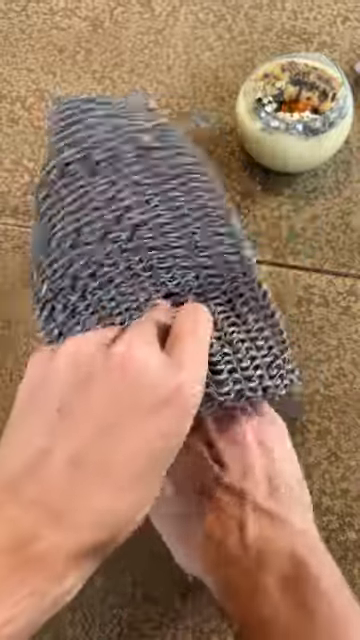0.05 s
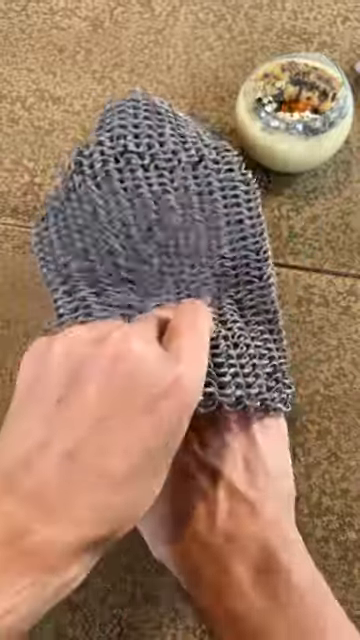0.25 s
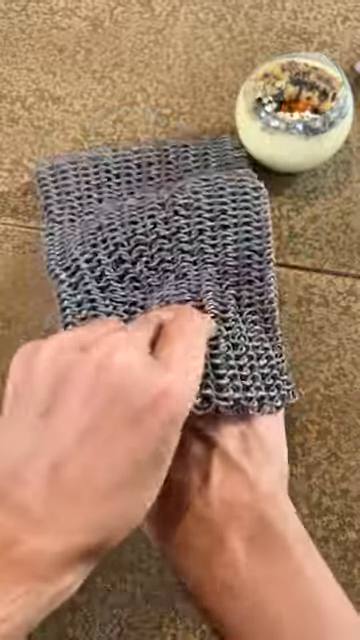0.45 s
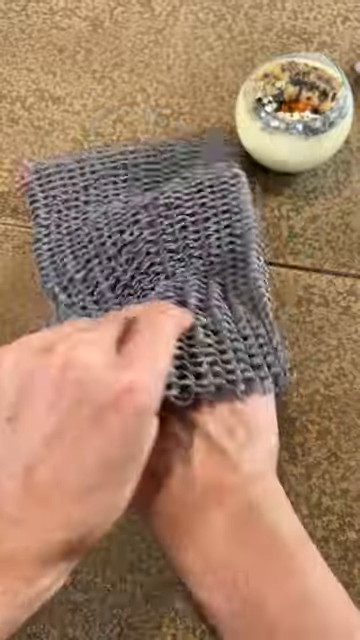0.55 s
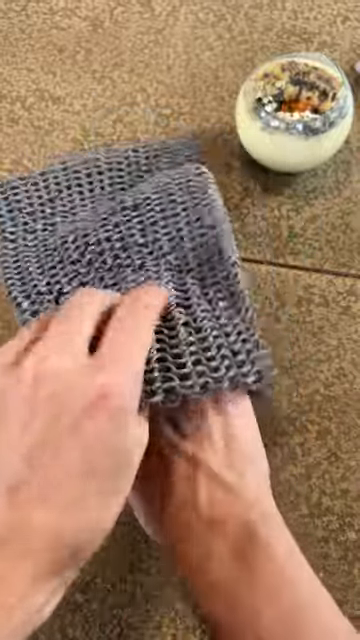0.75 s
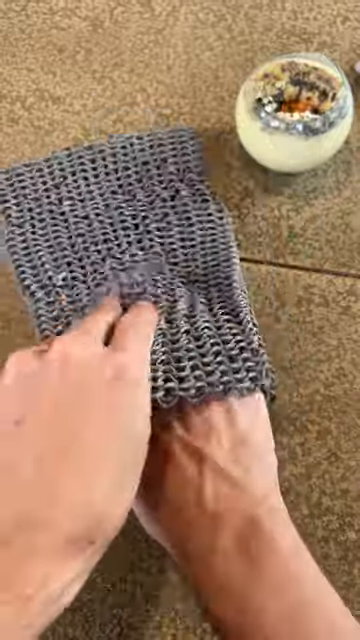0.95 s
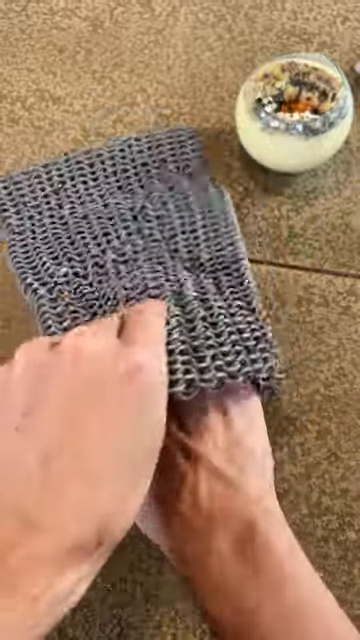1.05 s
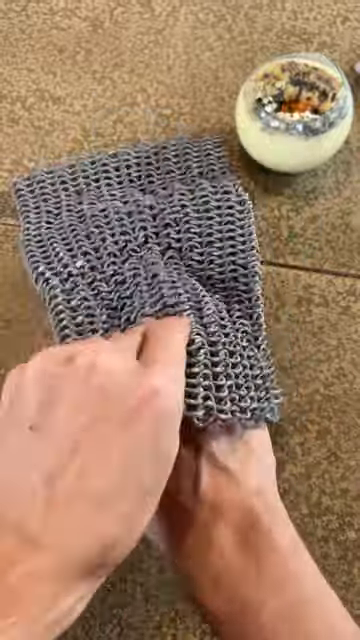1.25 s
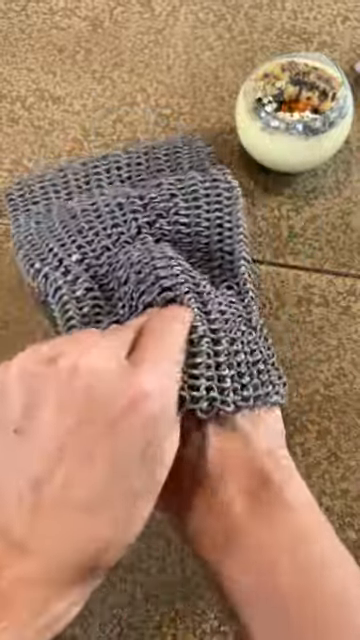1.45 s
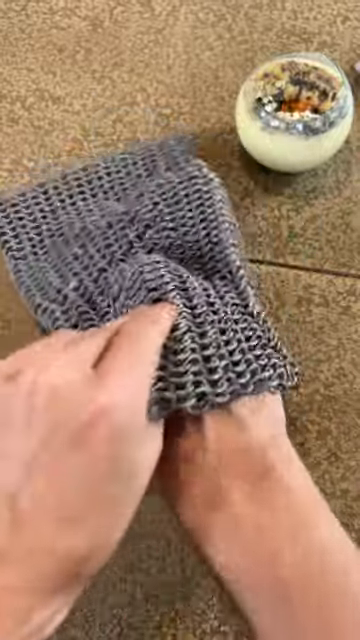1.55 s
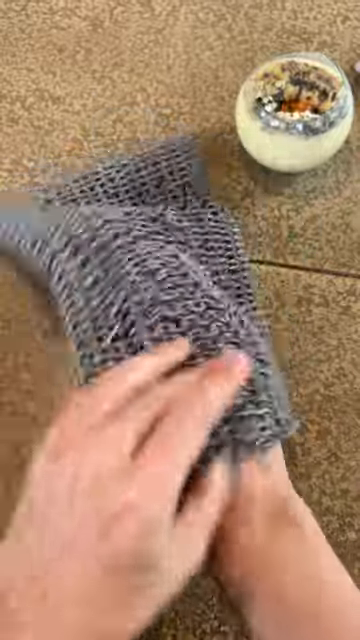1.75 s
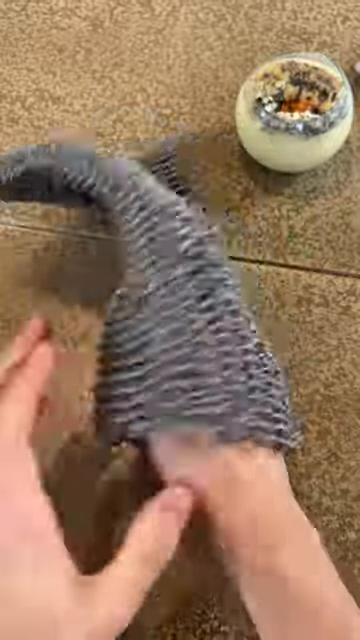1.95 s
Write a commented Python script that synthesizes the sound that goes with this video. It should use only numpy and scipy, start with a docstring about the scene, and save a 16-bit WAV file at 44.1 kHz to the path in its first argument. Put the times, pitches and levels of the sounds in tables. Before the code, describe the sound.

Steel chain mail slides and tinkles in a dense, bright, high-pitched rustle of tiny ring contacts as hands tug it. Sharp clashes cluster around 0.22 s with a soft slap, then a strong swish at 0.35 s and a crisp click near 0.5 s. Quieter shifting swells at 0.8 s; loud clashes and a dull thump come at 1.2-1.3 s, another swish at 1.7 s. Close, small dry room, faint hush.

```python
"""Steel chain mail slides and tinkles as a glove of it is tugged over a hand, above a table in a small room.
Random clicks stand for ring contacts; each ticks and sets one of many tuned links ringing.
Folds clash in dense bursts of clicks; the weight lands as noise slaps and ringing table modes.
Under it lie filtered noise for the rubbing hands and still air, and a short tail of reflections.
Two closely spaced microphone ports pick it up; the left one lags in the treble."""
import sys
import numpy as np
from scipy import signal
from scipy.fft import rfft, irfft
from scipy.io import wavfile
from scipy.ndimage import uniform_filter1d

SR = 44100
rng = np.random.default_rng(int(sys.argv[2]) if len(sys.argv) > 2 else 0)


def generate_wav(signal):
    """Clip the signal to [-1, 1] and save it as 16-bit WAV at the path in sys.argv[1]."""
    frames = np.transpose(np.atleast_2d(signal))
    scaled = np.clip(frames, -1, 1) * 32767
    pcm = np.round(scaled).astype(np.int16)
    wavfile.write(sys.argv[1], SR, pcm)


N = 88200
TIME_S = np.arange(N) / SR

# In colour tables only the shape counts where colour() is used: it evens out the overall level.
# Loudness course of the sliding mail, before SLIDE_DB: t/s, level/dB
SLIDE_LEVEL = [(0, -36.5), (0.04, -45.5), (0.12, -46), (0.205, -50.5), (0.235, -35.5), (0.29, -38.5),
               (0.35, -25.5), (0.385, -42.5), (0.44, -48.5), (0.48, -43), (0.505, -35), (0.56, -45.5),
               (0.69, -47), (0.745, -42.5), (0.82, -35.5), (0.92, -41.5), (0.98, -43.5), (1.08, -48.5),
               (1.17, -42.5), (1.23, -38.5), (1.305, -36.5), (1.385, -50), (1.46, -43), (1.52, -45.5),
               (1.585, -41), (1.625, -43), (1.715, -31.5), (1.8, -44), (1.88, -51.5), (2.0, -47)]
# Tick of one ring on another, and its top treble: f/Hz, level/dB
TICK_COLOUR = [(100, -16.5), (250, -10), (560, -13.5), (750, -13.5), (1900, -14), (3200, -16.5),
               (4700, -12), (5500, -9.5), (7000, -6.5), (8700, -0.5)]
TICK_TREBLE = [(10500, -4), (12800, -5.5), (15700, -8)]
# A fold flops over or snaps taut: t/s, level/dB before CLASH_DB, length/s, dull part against bright/dB
FOLD_CLASHES = [(.005, -30.5, 0.0026, -15), (0.037, -36.5, 0.0028, -17), (0.061, -29, 0.0032, -14.5),
                (0.106, -41.5, 0.0014, -22), (0.128, -37.5, 0.0034, -15), (0.166, -40, 0.0012, -13),
                (0.182, -41.5, 0.0064, -6.5), (0.2138, -35, 0.0035, -11), (0.2195, -18, 0.0059, -17),
                (.228, -17.5, 0.0029, -14), (0.231, -30, 0.0024, -29), (0.2464, -21.5, 0.00057, -14),
                (0.347, -41, .002, -13), (0.352, -32.5, 0.0026, -11), (0.4876, -26, 0.0002, -18),
                (0.492, -30, 0.00091, -23), (0.603, -39.5, 0.0037, -17.5), (0.708, -37, 0.0026, -21),
                (.731, -35.5, 0.0016, -14), (0.752, -40, 0.0069, -7.5), (.796, -41, 0.00089, -16),
                (0.93, -39, 0.0033, -7), (1.007, -40, 0.0022, -8), (1.034, -38, 0.0009, -7),
                (1.051, -46, 0.003, -5), (1.0861, -30.5, 0.0005, -7), (1.1205, -39, 0.00081, -7),
                (1.169, -32, 0.00041, -9), (1.189, -47, 0.0014, 1), (1.1953, -23.5, 0.0057, -16.5),
                (1.219, -16.5, 0.00025, -18), (1.241, -37, 0.0016, -5), (1.2538, -22.5, 0.0023, -21.5),
                (1.255, -45, 0.0012, -10), (1.266, -23, 0.0047, -16), (1.2711, -19, 0.0017, -19.5),
                (1.2895, -22, .0006, -18), (1.2935, -28.5, 0.0087, -13.5), (1.404, -44, 0.0024, -20),
                (1.436, -49, 0.00056, 2), (1.558, -44, 0.0014, -24), (1.583, -36, 0.0077, -20),
                (1.708, -30, .002, -32), (1.775, -36.5, 0.0024, -38)]
# Bright part of a clash, and its top treble: f/Hz, level/dB
CLASH_COLOUR = [(120, -2), (300, -15), (560, -31), (800, -29.5), (1500, -43), (3000, -24.5), (4400, -20.5),
                (4900, -11), (5700, -9), (7200, -7.5), (9000, -1.5)]
CLASH_TREBLE = [(10500, -4), (11700, -2), (13200, -5), (15700, -4.5)]
# Dull part of a clash, from rings pressed against the hand: f/Hz, level/dB
DULL_COLOUR = [(300, -29.5), (900, -5.5), (1400, -2), (2100, 0.5), (3100, -2), (3800, 1), (5000, -3.5),
               (8000, -5), (12000, -40)]
# The mail lands on hand and table: t/s, low knock level/dB, slap level/dB
LANDINGS = [(.229, -80, -36.5), (0.254, -49, -74), (0.352, -57, -48), (0.463, -56, -47),
            (1.198, -67, -43.5), (1.269, -60, -44.5), (1.298, -39, -64), (1.714, -57.5, -47)]
# Ways the table vibrates: f/Hz, level/dB, time to fall by 60 dB/s
TABLE_MODES = [(51, -3, .35), (120, -11, .08), (171, 4, .2)]
# Slap of the mail on the hand: f/Hz, level/dB
SLAP_COLOUR = [(50, -23.5), (130, -26), (230, -5), (330, 0.5), (440, -7.5), (550, 8.5), (720, -19.5),
               (1200, -6.5), (2500, -34)]
# Loudness course of the rubbing hands: t/s, level/dB
RUB_LEVEL = [(0, -51), (.2, -51), (.29, -46), (.42, -48), (.58, -51.5), (.85, -51.5), (1.0, -54.5),
             (1.16, -52.5), (1.26, -42), (1.33, -49), (1.39, -54), (1.46, -49.5), (1.55, -58), (1.7, -59),
             (2, -52.5)]
# Dull sound of the rubbing: f/Hz, level/dB
RUB_SHAPE = [(20, -63), (33, -20.5), (50, 0.5), (75, -0.5), (105, -7.5), (170, -7.5), (280, -12),
             (420, -35), (540, -15), (750, -44), (2000, -23)]
# Still air of the room: f/Hz, level/dB
AIR_COLOUR = [(20, -32), (65, -1.5), (250, -6.5), (450, -11.5), (1000, -10.5), (4000, -34.5), (15000, -16)]
# Strength of the reflections: f/Hz, level/dB
REFLECTION_COLOUR = [(100, 2), (400, 9.5), (850, 0), (1500, -3), (4000, 4.5), (11000, -4)]
# Left-right difference in diffuse sound, before SIDE_DB: f/Hz, level/dB
SIDE_COLOUR = [(60, -10.5), (250, -0.5), (850, 5.5), (1300, 1.5), (1900, -29.5), (2700, -19.5), (5000, 3.5),
               (6500, -8.5), (9000, 9)]
# Phase lead of the left port (negative values are a lag): f/Hz, phase/rad
LEFT_PORT_PHASE = [(0, 0), (4150, 0), (4800, -1.1), (5450, -5.7), (5750, -6.28), (7400, -6.28),
                   (7800, -6.85), (8800, -7.35), (11300, -8.25), (12600, -9.42), (22050, -9.42)]

# Sliding: contacts per second at the average level, and dB of rate for each dB of level
SLIDE_DB, CONTACTS_PER_S, RATE_FOLLOWS = -3, 4500, .7
SIZE_SPREAD_DB = 2.5  # unevenness of contact sizes
CLUMP_DB, CLUMP_RATE_HZ = 1.65, 37  # depth and speed of the clumping
LINK_HZ, LINK_SPREAD_OCT, LINK_T60_S = 8934, 0.066, 0.037
SLIDE_RING_DB, CLASH_RING_DB = -9.5, -12.5  # ringing against the ticks
# Dull clacks, and bright tinks of loose rings at the hem; cycles until they fall by 60 dB
CLACKS_PER_S, CLACK_DB, CLACK_LOW_HZ, CLACK_HIGH_HZ, CLACK_CYCLES = 260, -21, 1144, 4700, 22
TINKS_PER_S, TINK_DB, TINK_LOW_HZ, TINK_HIGH_HZ, TINK_CYCLES = 900, -9.5, 5360, 16070, 110
# Clashes: build-up time, fading time, and shortest span over which the level counts
CLASH_DB, CLASH_CONTACTS_PER_S = 1.5, 11000
GATHER_S, SETTLE_S, CLASH_SPAN_S = 0.00086, 0.0016, 0.0027
SLAP_DECAY_S = 0.012
CLASH_PAN_DB, THUD_PAN_DB = 0.7, -1.5  # above zero: louder on the left
MAIL_LOW_HZ = 138  # the small rings radiate little below this
AIR_DB, ROOM_DB, ROOM_T60_S = -61.5, -13.5, 0.12
SIDE_DB, SIDE_TOP_HZ = -4.5, 11700
CUTOFF_HZ = 15900  # top of the whole sound


def from_db(db):
    """Turn decibels into a plain multiplier."""
    return 10 ** (np.asarray(db) / 20)


def rms_one(x):
    """Scale to an average power of one."""
    return x / np.sqrt(np.mean(x ** 2) + 1e-20)


def in_time(rows):
    """Join the (time, value) rows by straight lines."""
    return np.interp(TIME_S, *np.transpose(rows))


def gain_curve(points):
    """Join (frequency, dB) points by straight lines over pitch, as gains."""
    grid = np.fft.rfftfreq(2 * N, 1 / SR)
    hz, db = np.transpose(points)
    return from_db(np.interp(np.log(grid + 1), np.log(hz), db))


def shade(x, points):
    """Tone control that follows the points and shifts no frequency in time."""
    return irfft(rfft(x, 2 * N) * gain_curve(points))[..., :N]


def colour(x, points):
    """Tone control of unit power gain that sounds only after its input, never before."""
    grid = np.fft.rfftfreq(2 * N, 1 / SR)
    top_fade = np.hypot(1, (grid / CUTOFF_HZ) ** 20)
    gain = rms_one(gain_curve(points) / top_fade)
    # Folding the cepstrum finds the phase that puts the energy as early as possible
    cepstrum = irfft(np.log(gain))
    cepstrum[1:N] *= 2
    cepstrum[N + 1:] = 0
    return irfft(rfft(x, 2 * N) * np.exp(rfft(cepstrum)))[..., :N]


def drift(rate_hz):
    """Slow random wandering of unit power: noise smoothed twice."""
    r = np.exp(-2 * np.pi * rate_hz / SR)
    wander = signal.lfilter([1], [1, -2 * r, r * r], rng.standard_normal(2 * N))
    return rms_one(wander[N:])  # skip the start-up


def ring(clicks, hz, t60_s):
    """Resonance: a unit click sets a dying sine of height about one ringing."""
    r = from_db(-60 / (t60_s * SR))
    w = 2 * np.pi * hz / SR
    return signal.lfilter([0, np.sin(w)], [1, -2 * r * np.cos(w), r * r], clicks + 1e-18)


def contacts(rate):
    """Ring contacts as random clicks, many small and a few large."""
    size_db = SIZE_SPREAD_DB * np.minimum(rng.exponential(1, N), 4)
    sizes = from_db(size_db) * rng.choice([-1, 1], N)
    return sizes * (rng.random(N) < rate / SR)


def links(clicks, tick, ring_db, count=40):
    """Every contact ticks and sets one of many slightly unlike links ringing."""
    dealt = rng.integers(0, count, N)
    rank = (np.arange(count) + .5) / count
    # Most pitches lie close to the centre, a few farther out
    pitches = LINK_HZ * 2 ** (LINK_SPREAD_OCT * .5 * np.log(rank / (1 - rank)))
    rings = sum(ring(clicks * (dealt == k), hz, LINK_T60_S) for k, hz in enumerate(pitches))
    return colour(clicks, tick) + from_db(ring_db) * clicks.std() * rms_one(rings)


def pings(clicks, low_hz, high_hz, cycles, count=30):
    """Each click rings briefly at one of many pitches; the overall power is kept."""
    dealt = rng.integers(0, count, N)
    rings = np.zeros(N)
    for k, hz in enumerate(np.linspace(low_hz, high_hz, count)):
        # Higher rings die sooner, so they start stronger
        rings += np.sqrt(hz) * ring(clicks * (dealt == k), hz, cycles / hz)
    return clicks.std() * rms_one(rings)


def no_bass(x):
    """Remove the bass that small rings hardly radiate."""
    return signal.sosfilt(signal.butter(4, MAIL_LOW_HZ, "high", fs=SR, output="sos"), x)


def pan(x, db):
    """Make left louder than right by this many dB."""
    return x * from_db(db * np.array([[.5], [-.5]]))


def spread(mid, side):
    """Left and right of a diffuse sound: they differ only below the top treble."""
    side = signal.sosfilt(signal.cheby1(10, .5, SIDE_TOP_HZ, fs=SR, output="sos"), side)
    return mid + from_db(SIDE_DB) * shade(side, SIDE_COLOUR) * np.array([[1], [-1]])


def still_air():
    """Faint steady hush of the room: filtered noise, partly different left and right."""
    return from_db(AIR_DB) * spread(*colour(rng.standard_normal((2, N)), AIR_COLOUR))


def room(x):
    """Short, weak reflections: each sound is smeared by a tail of dying noise."""
    fade = from_db(-60 * TIME_S / ROOM_T60_S) * (TIME_S > .003)  # nothing in the first 3 ms
    tail = spread(*shade(rng.standard_normal((2, N)) * fade, REFLECTION_COLOUR))
    tail = tail / np.sqrt(np.sum(tail[0] ** 2))
    return from_db(ROOM_DB) * signal.fftconvolve(x[None], tail, axes=1)[:, :N]


def rubbing_hands():
    """Soft rumble of skin and mail shifting: dull noise that swells and sinks."""
    return from_db(in_time(RUB_LEVEL)) * rms_one(colour(rng.standard_normal(N), RUB_SHAPE))


def thuds():
    """The weight of the mail slaps the hand (short noise) and knocks the table (ringing modes)."""
    knocks, slaps = np.zeros(N), np.zeros(N)
    for start, knock_db, slap_db in LANDINGS:
        knocks[int(start * SR)] = from_db(knock_db)
        fade = np.exp(-np.abs(TIME_S - start) / SLAP_DECAY_S)
        slaps += from_db(slap_db) * (TIME_S >= start) * fade
    table = sum(ring(knocks, hz, t60_s) * from_db(db) for hz, db, t60_s in TABLE_MODES)
    return table + no_bass(colour(slaps * rng.standard_normal(N), SLAP_COLOUR))


def clashing_folds():
    """Many rings collide within a few milliseconds, then settle."""
    bright, dull = np.zeros(N), np.zeros(N)
    clicks = contacts(CLASH_CONTACTS_PER_S)
    for start, db, length, dull_db in FOLD_CLASHES:
        rise = np.clip((TIME_S - start) / GATHER_S + .5, 0, 1) ** 2
        fall = np.exp(-np.maximum(TIME_S - start - length, 0) / SETTLE_S)
        burst = clicks * rise * fall
        # Set the energy, however many clicks chance put into the burst
        span = max(length, CLASH_SPAN_S) * SR
        burst *= from_db(db + CLASH_DB) * np.sqrt(span / (np.sum(burst ** 2) + 1e-9))
        bright += burst
        dull += from_db(dull_db) * burst
    bright_clash = links(bright, CLASH_COLOUR + CLASH_TREBLE, CLASH_RING_DB)
    dull_clack = colour(dull * rng.choice([-1, 1], N), DULL_COLOUR)
    return bright_clash + dull_clack


def sliding_mail():
    """Faster movement brings more and harder ring contacts, in clumps, with clacks and tinks among them."""
    db = in_time(SLIDE_LEVEL)
    rate = CONTACTS_PER_S * from_db(RATE_FOLLOWS * (db - db.mean()))
    clicks = contacts(rate) * from_db(CLUMP_DB * drift(CLUMP_RATE_HZ))
    # Even out the power over about 25 ms, so that the level table alone sets the loudness
    clicks = clicks / np.sqrt(uniform_filter1d(clicks ** 2, size=1100) + 1e-6)
    clack_clicks = from_db(db + CLACK_DB) * rms_one(contacts(CLACKS_PER_S))
    clacks = pings(clack_clicks, CLACK_LOW_HZ, CLACK_HIGH_HZ, CLACK_CYCLES)
    tink_clicks = from_db(db + TINK_DB) * rms_one(contacts(TINKS_PER_S))
    tinks = pings(tink_clicks, TINK_LOW_HZ, TINK_HIGH_HZ, TINK_CYCLES)
    sliding = links(clicks * from_db(db + SLIDE_DB), TICK_COLOUR + TICK_TREBLE, SLIDE_RING_DB)
    return sliding + clacks + tinks


def scene():
    """Mail, hands and table in the room, as left and right."""
    slide, clash, thud = no_bass(sliding_mail()), no_bass(clashing_folds()), thuds()
    air = still_air()
    direct = slide + pan(clash, CLASH_PAN_DB) + pan(thud, THUD_PAN_DB)
    return direct + room(slide + clash + thud) + rubbing_hands() + air


def record(dry):
    """The left port lags in the treble; the very top is cut on both sides."""
    hz = np.fft.rfftfreq(2 * N, 1 / SR)
    turn = np.exp(1j * np.interp(hz, *np.transpose(LEFT_PORT_PHASE)))
    left = irfft(rfft(dry[0], 2 * N) * turn)[:N]
    top_cut = signal.ellip(12, .1, 80, CUTOFF_HZ, fs=SR, output="sos")
    return signal.sosfilt(top_cut, [left, dry[1]])


dry = scene()
out = record(dry)
generate_wav(out)
```